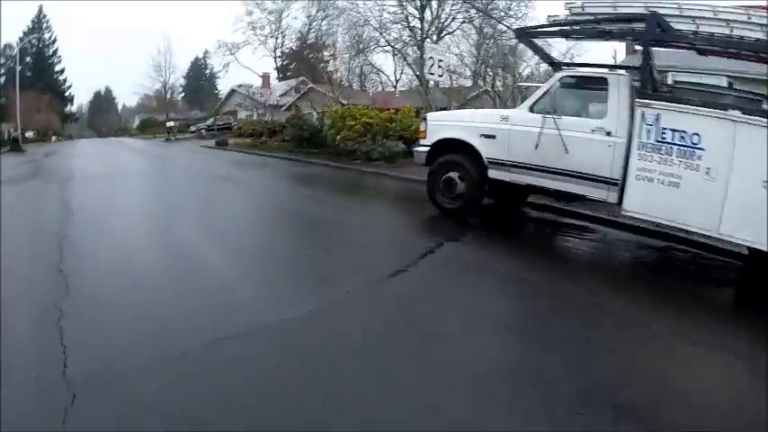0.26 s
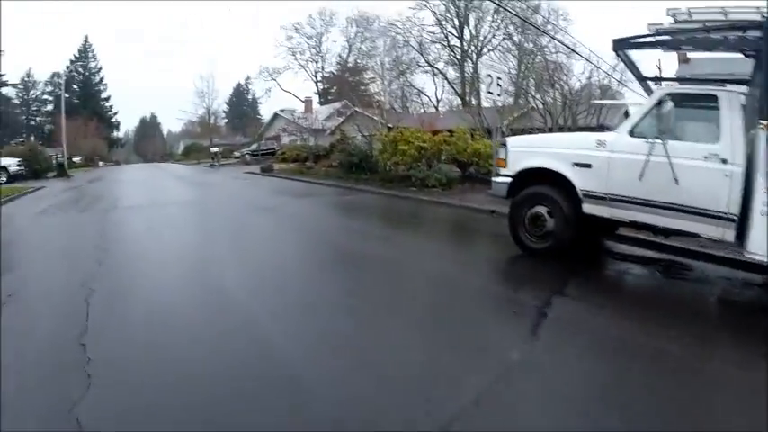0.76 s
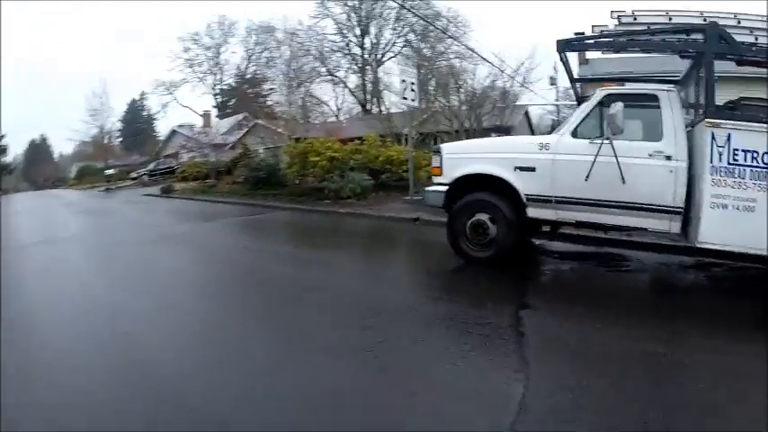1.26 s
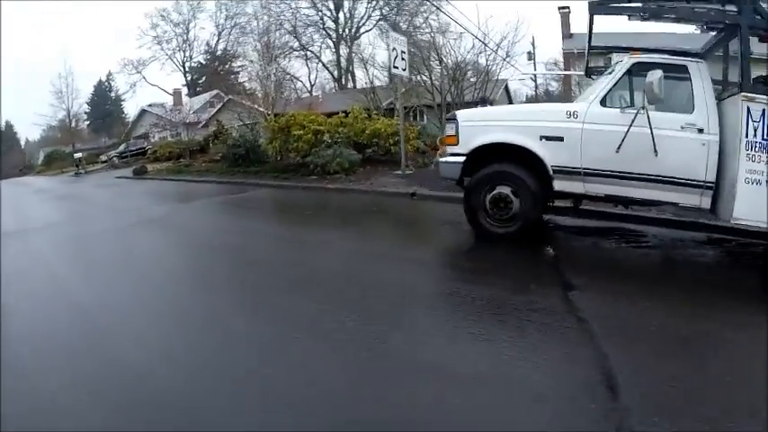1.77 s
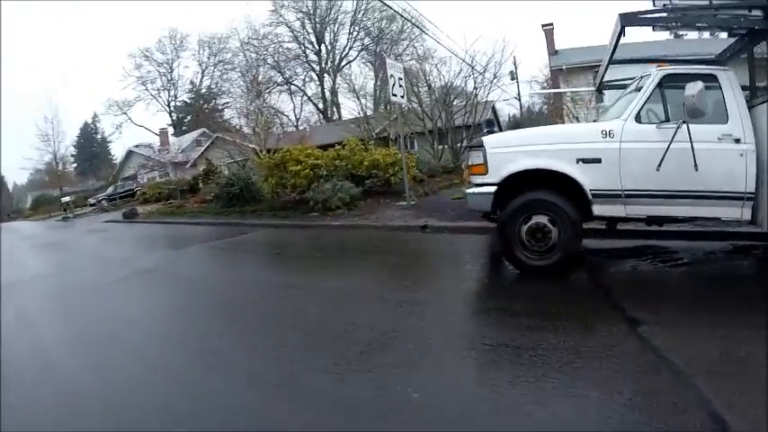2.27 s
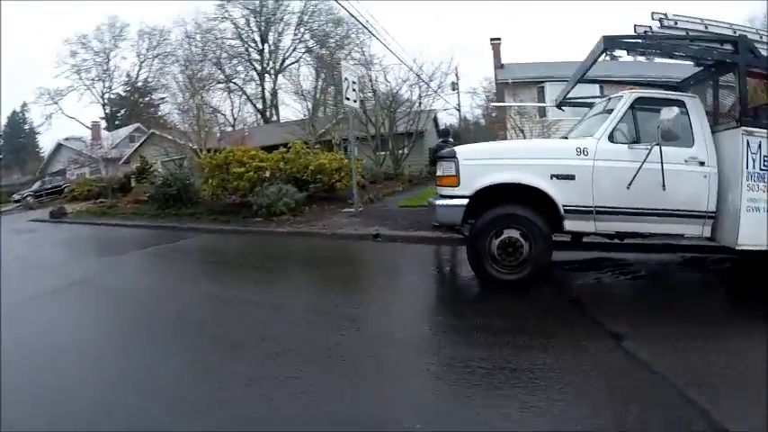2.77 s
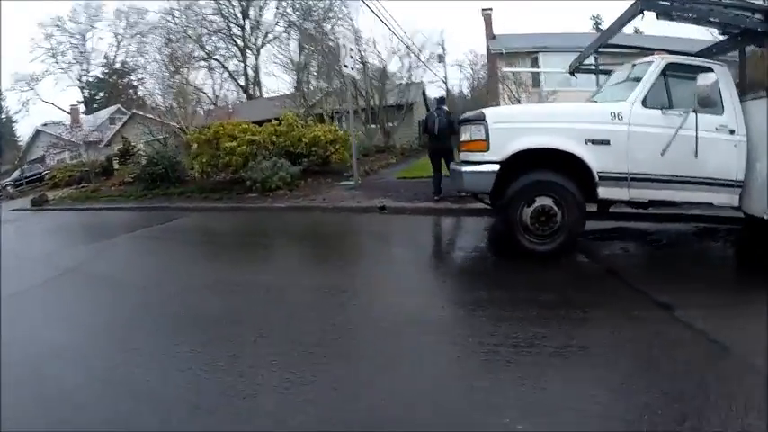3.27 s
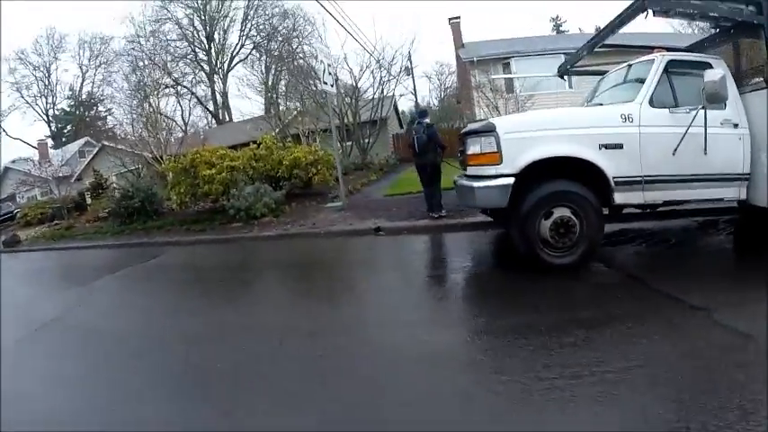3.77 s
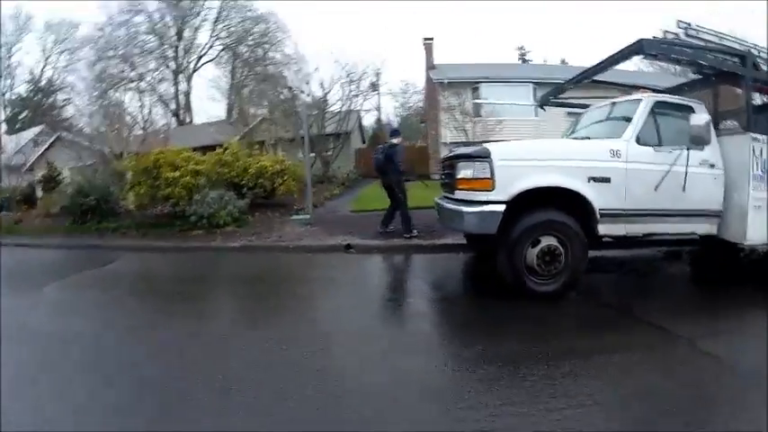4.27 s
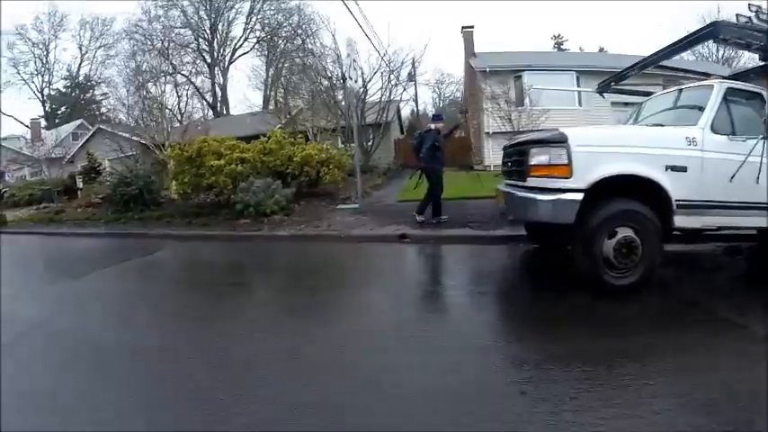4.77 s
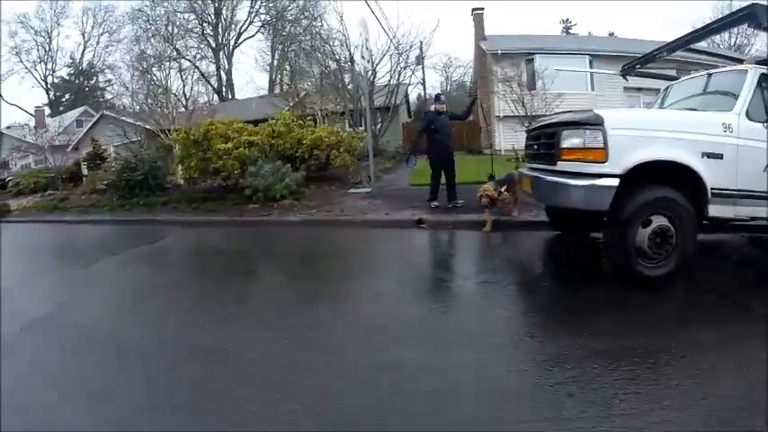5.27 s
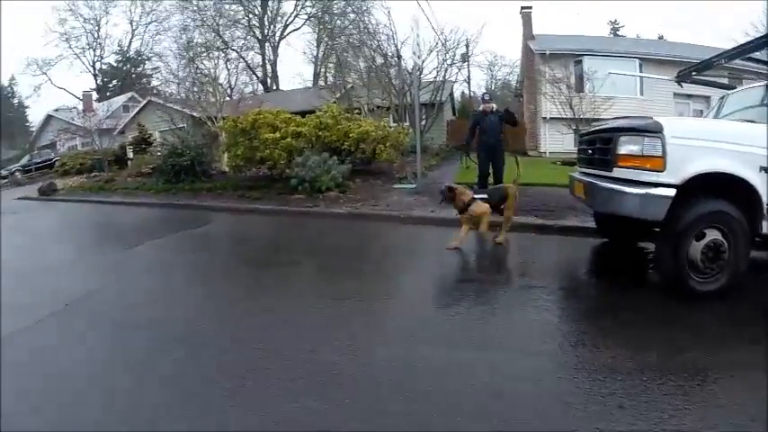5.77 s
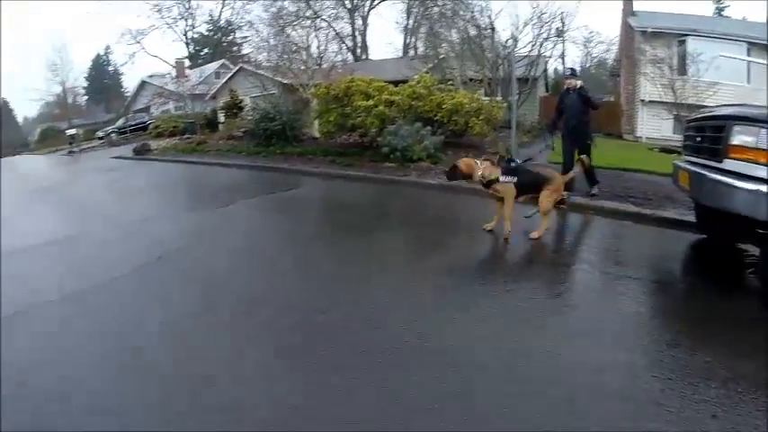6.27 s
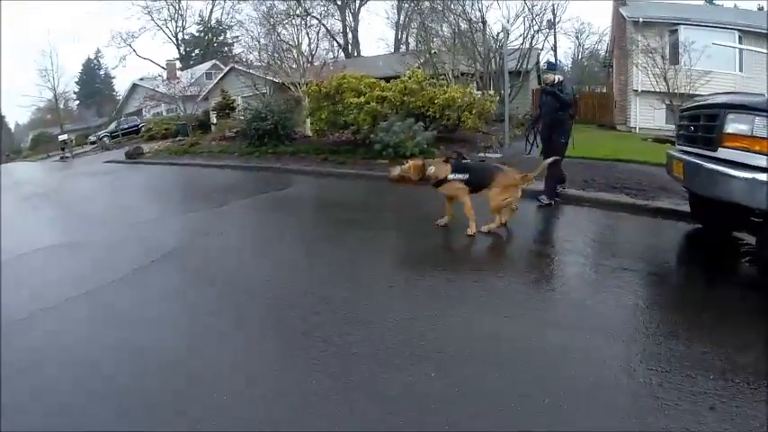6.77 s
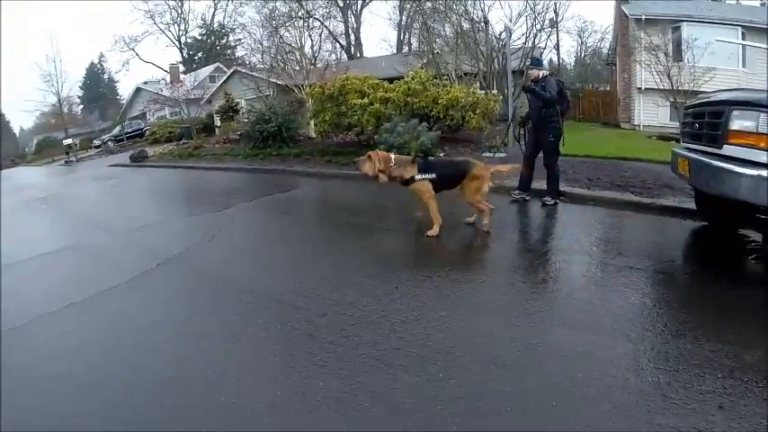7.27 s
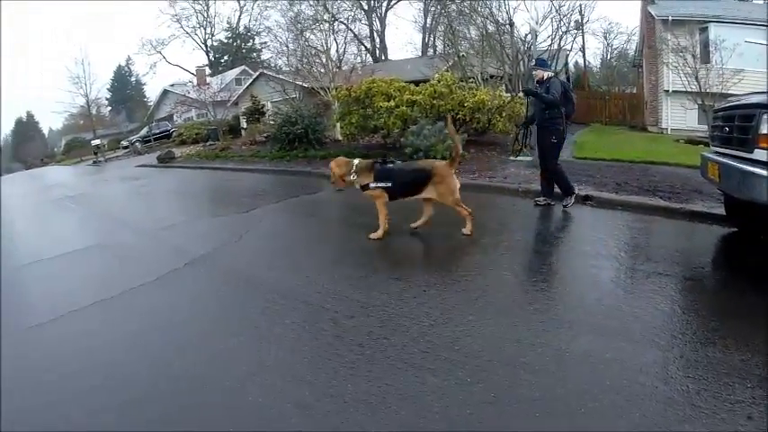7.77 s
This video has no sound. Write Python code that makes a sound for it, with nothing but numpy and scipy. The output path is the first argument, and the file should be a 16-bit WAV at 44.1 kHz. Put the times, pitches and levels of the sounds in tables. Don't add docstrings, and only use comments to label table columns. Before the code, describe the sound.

Dry, close plastic clicking comes first, sparse and irregular, some snaps sharp and some knocks blunt, with soft low thumps beneath. The open-air bed is very quiet: soft wind rumble, far traffic, fine wet hiss and a barely audible thin whine. Later, light scratchy steps and shivering harness metal enter as a dog passes, much softer than the loudest case knocks heard by the carried microphone.

```python
import sys
import numpy as np
from scipy import signal
from scipy.fft import rfft, irfft, next_fast_len
from scipy.io import wavfile

SR = 44100
rng = np.random.default_rng(int(sys.argv[2]) if len(sys.argv) > 2 else 0)


def to_wav(sig):
    pcm = np.clip(np.atleast_2d(sig), -1, 1) * 32767
    pcm = np.round(pcm).astype(np.int16)
    wavfile.write(sys.argv[1], SR, pcm.T)


def invert_db(level):
    return 10 ** (np.asarray(level, dtype=float) / 20)


N = 354411
LENGTH = 4096

# pitch_hz, level_db, t60_s
TAGS = [
    [(11500, 0, .035), (11150, -6, .02), (15100, -24, .03), (4860, -20, .02)],
    [(12130, 0, .03), (12550, -10, .016), (11700, -12, .02)],
    [(9150, 0, .025), (8170, -10, .03), (9500, -4, .022)],
]
# time_s, level_db
TROT = [
    (5.7, -81),
    (6.2, -60),
    (6.56, -68),
    (7.1, -59),
    (7.7, -72),
]


def rms_one(x):
    return x / np.sqrt(np.mean(x ** 2) + 1e-20)


def peak_one(rows):
    return rows / (np.abs(rows).max(axis=1, keepdims=True) + 1e-20)


def band(rows, low_hz, high_hz, order=3):
    sos = signal.butter(order, [low_hz, min(high_hz, 20000)], "band", fs=SR, output="sos")
    return signal.sosfilt(sos, rows)


def drift(rate):
    r = np.exp(-80 * np.pi * rate / SR)
    slow = signal.lfilter([1], [1, -2 * r, r * r], rng.standard_normal(N // 40 + 2002))[2000:]
    return np.interp(np.arange(N) / 40, np.arange(len(slow)), rms_one(slow))


def ring(clicks, hz, t60):
    r = invert_db(-60 / (t60 * SR))
    w = 2 * np.pi * hz / SR
    return signal.lfilter([0, np.sin(w)], [1, -2 * r * np.cos(w), r * r], clicks + 1e-18)


def strike(contact, modes, spread_db):
    luck = invert_db(spread_db * rng.standard_normal((len(contact), len(modes))))
    rows = 0
    for k, (hz, db, t60) in enumerate(modes):
        rows = rows + invert_db(db) * luck[:, [k]] * ring(contact, hz, t60)
    return peak_one(rows)


def contacts(count, per_s, fade_s, first):
    rows = rng.standard_normal((count, LENGTH)) * (rng.random((count, LENGTH)) < per_s / SR)
    rows[:, 0] = -first
    return rows * np.exp(-(np.arange(LENGTH) / SR / fade_s) ** 2)


def ease(rise_s):
    return 1 - np.exp(-np.arange(LENGTH) / SR / rise_s)


def place(times, rows):
    out = np.zeros(N + LENGTH)
    for s, row in zip(times, rows):
        start = round(s * SR)
        out[start:start + LENGTH] += row
    return out[:N]


def single_modes(table):
    click = np.arange(LENGTH) == 0
    rows = np.array([band(ring(click, hz, t60), 0.31 * hz, 4.6 * hz) for s, db, hz, t60 in table])
    s, db, hz, t60 = np.array(table).T[:, :, None]
    return place(s[:, 0], invert_db(db) * peak_one(ease(0.00095) * rows))


def banded_noise(spectrum, patchy_db, rate):
    hz, db = np.transpose(spectrum)
    size = next_fast_len(N)
    grid = np.fft.rfftfreq(size, 1 / SR) + 1e-3
    tilt_db = np.interp(np.log(grid), np.log(hz), db, left=-90, right=-90)
    coloured = rfft(rng.standard_normal(size)) * invert_db(tilt_db)
    octave = np.log2(grid / hz[0])
    together = drift(rate / 3)
    out = 0
    for k in range(int(np.log2(hz[-1] / hz[0])) + 2):
        window = np.cos(np.pi / 2 * np.clip(octave - k, -1, 1)) ** 2
        part = irfft(coloured * window, size)[:N]
        out = out + part * invert_db(patchy_db * (.6 * together + drift(rate)))
    return rms_one(out)


def street():
    # frequency_hz, level_db (per Hz)
    wind_colour = [(5.9, -8.5), (10, 0), (40, 7), (86, -7), (129, -8.5), (200, -37), (260, -24.5),
                   (440, -120)]
    traffic_colour = [(47, -29), (80, 0.5), (343, -9.5), (3000, -21), (3900, -32), (6600, -120)]
    hiss_colour = [(1060, -19), (1800, -2.5), (2790, -3), (5180, -5), (5900, -5.5), (7340, -12.5),
                   (12000, -17.5), (13200, -21), (15200, -25.5)]
    # time_s, level_db
    gusts = [(0.0, -58), (0.18, -50.5), (2.28, -55.5), (2.48, -49), (2.68, -53.5), (4.05, -55), (5.46, -48),
             (5.91, -53.5), (6.42, -49.5), (6.96, -58), (8.04, -54)]
    # pitch_hz, width_hz, level_db
    whine_tone = (5670, 45, -77)
    t = np.arange(N) / SR
    wind = invert_db(np.interp(t, *np.transpose(gusts))) * banded_noise(wind_colour, patchy_db=3.0, rate=4.2)
    traffic = invert_db(-59.5) * banded_noise(traffic_colour, patchy_db=.5, rate=10)
    fade_db_per_s, splash_db, splash_s, splash_width_s = 0.37, 3.5, 6.78, 0.23
    splash = splash_db * np.exp(-((t - splash_s) / splash_width_s) ** 2)
    hiss_db = -65 - fade_db_per_s * t + splash
    hiss = invert_db(hiss_db) * banded_noise(hiss_colour, patchy_db=.4, rate=14)
    hz, width, db = whine_tone
    wander_hz, wander_per_s = 60, .8
    turns = np.cumsum(hz + wander_hz * drift(wander_per_s)) / SR
    flutter = signal.sosfilt(signal.butter(2, width, fs=SR, output="sos"), rng.standard_normal(N))
    whine = rms_one(flutter * np.sin(2 * np.pi * turns)) * invert_db(db - 1.5 + 1.5 * drift(4.4))
    return wind + traffic + whine + hiss


def tick_rows():
    # time_s, peak_db of the main modes,
    # then low_db, middle_db, upper_db relative to it
    blunt = [(0.7444, -15, -11.5, -25, -16.5), (0.7943, -37.5, -3, 7, 5), (0.8112, -30.5, -20, -27, -16),
             (1.0343, -27.5, -16, -18, -12.5), (1.5753, -38, -18, -6, -10), (1.5764, -26.5, -11, -6, -15),
             (3.5554, -8, -23, 3.5, -2), (3.5714, -32.5, -29.5, -3, -20), (5.1461, -7.5, -12, -25, -27.5),
             (6.433, -14.5, -17.5, -7, -10), (6.5717, -18.5, -22, -14, -19), (6.8688, -33, -26, -13, -22),
             (7.0179, -35, -6, -5, -16)]
    sharp = [(0.4069, -48, -7, -5, -6), (1.2288, -17, -22, -13, -24), (1.2299, -14.5, -11, -27, -30),
             (1.7872, -32.5, -14, -6, -13), (2.3012, -41, -23, -1, -1), (2.7738, -24, 4.5, 5, -17),
             (3.0751, -37, 4.5, 5, -3), (3.842, -48, 0, 1.5, -1), (3.9013, -21, -21.5, -6.5, -14.5),
             (4.5356, -43, -8, -3, -8.5), (4.6172, -27, -25, 2, 1), (4.6179, -16.5, -41, -26, -25),
             (5.1604, -36, 2, -4, -17), (5.1616, -23, -6, -2, -22), (5.7384, -50.5, -9, 13.5, 0),
             (5.74, -45, 7, 0, 7)]
    lid = [(1.1116, -37.5, -10, -0.5, -15), (1.1138, -56, -18, -8, -19), (1.5464, -34.5, -22, 5, 1.5),
           (3.0184, -37, -8, 6, -10.5), (3.2353, -37, -11, -7, -18), (5.2531, -25.5, -8, 0, -11.5),
           (7.1912, -29, -8.5, -4.5, -19), (7.4608, -37.5, -10, 6, -12), (7.7358, -33, -14, 2, -12.5),
           (7.752, -30.5, -21, -6, -19)]
    # time_s, peak_db of the main modes, hardness_db (level of the middle modes)
    faint_ticks = [(0.075, -50.5, 3), (0.282, -44, 1.5), (0.3977, -52, -2), (0.907, -54, -1),
                   (1.466, -53, -5), (2.385, -45.5, -19), (2.939, -60, 7), (3.3906, -37.5, -5),
                   (3.405, -48.5, 2), (4.3847, -41.5, -6), (4.5482, -40, -3), (4.5863, -49, 6.5),
                   (4.7045, -41.5, -1), (4.725, -45.5, -8), (4.799, -43.5, -21), (4.8872, -34, -8),
                   (4.8993, -40, -15), (2.79, -56, 9), (5.029, -48, 4.5), (5.4457, -76, 13.5),
                   (5.8193, -65, 9), (5.9502, -44.5, 6), (6.0928, -46, -5), (7.3524, -46, -2),
                   (7.671, -44.5, -10), (7.6934, -54, 1.5)]
    low_db, upper_db = -11, -12
    faint = [(s, db, low_db, hard, hard + upper_db) for s, db, hard in faint_ticks]
    # crack_db over the upper modes, lid_db over the wall modes, lasting mode_db
    kinds = ((blunt, (-13.5, 1, -14)), (faint, (-19, -0.76, -15.5)),
             (sharp, (-4.5, -12.5, -9.5)), (lid, (-12, 10.7, -9.5)))
    return [(*row, *kind) for rows, kind in kinds for row in rows]


def ticks():
    # pitch_hz, level_db, t60_s
    case_modes = [
        [(1640, 0, .0095), (1330, -17, .007), (1800, -10, .007)],
        [(2260, 0, .007), (2050, -8, .006)],
        [(2830, 0, .009), (2600, -9, .007)],
        [(3290, 0, .013), (2390, -1, .014), (3840, -6, .01), (4180, -6, .01), (2070, -5, .012)],
        [(4500, -8, .005), (4870, -2, 0.006), (5400, -2, 0.005), (5950, 5, 0.008), (6500, -4, .004),
         (7150, -6, .004)],
        [(8000, 8, 0.001), (8700, 4, 0.002), (10200, 0, 0.0019), (12300, 0, .003), (14000, -8, 0.003)],
    ]
    # low_hz, high_hz
    case_edges = [(1150, 2500), (1550, 3200), (2000, 3800), (1900, 5000), (3800, 7800), (6500, 13500)]
    # pitch_hz, t60_s
    case_ring = (2191, .050)
    contact_cycles = .7
    s, main_db, low_db, mid_db, upper_db, crack_db, lid_db, ring_db = np.array(tick_rows()).T[:, :, None]
    touch = contacts(count=len(s), per_s=1500, fade_s=.0012, first=3.5)
    levels_db = (low_db + 9.0, 0, mid_db - lid_db / 2, mid_db + lid_db / 2,
                 upper_db + 9.0, upper_db + crack_db + 12.5)
    rows = invert_db(ring_db) * peak_one(band(ring(touch, *case_ring), *case_edges[1], order=1))
    for db, modes, edges in zip(levels_db, case_modes, case_edges):
        struck = ease(contact_cycles / edges[1]) * strike(touch, modes, spread_db=2)
        rows += invert_db(db) * peak_one(band(struck, *edges, order=2))
    rustle = rng.standard_normal(touch.shape) * invert_db(-60 * np.arange(LENGTH) / SR / 0.021)
    peak = np.abs(rows).max(axis=1, keepdims=True)
    rows += invert_db(-15.0) * peak * peak_one(band(rustle, 2400, 3730))
    rows = invert_db(main_db) * band(rows, 950, 15500, order=2)
    rows /= np.maximum(np.abs(rows).max(axis=1, keepdims=True) / 1.05, 1)
    return place(s[:, 0], rows)


def wobbles():
    # peak_s, peak_db, width_s
    swing_table = [(0.137, -45, .012), (0.37, -44.5, 0.013), (0.684, -46, 0.02), (0.803, -44.5, 0.02),
                   (1.024, -44, 0.021), (1.131, -45.5, .02), (1.597, -40, 0.031), (1.71, -39, 0.014),
                   (1.775, -45.5, 0.017), (2.01, -48, 0.021), (2.098, -46, 0.017), (2.333, -37.5, 0.014),
                   (2.426, -35, 0.022), (2.557, -49, 0.019), (3.023, -40.5, 0.017), (3.233, -46, .021),
                   (3.562, -42.5, 0.0085), (3.643, -47, 0.033), (4.04, -47.5, 0.029), (4.235, -48.5, 0.016),
                   (4.868, -41, 0.059), (4.92, -44.5, .016), (4.818, -46.5, 0.017), (2.76, -50.5, 0.028),
                   (5.449, -48, .015), (5.019, -46, .013), (5.18, -47, 0.016), (6.25, -52.5, 0.037),
                   (6.393, -38, 0.019), (6.486, -39.5, 0.027), (6.771, -39.5, .017), (7.171, -42.5, 0.013),
                   (7.838, -39.5, .018)]
    mount_hz, spread_hz = 128.6, 12
    lead_s = .03
    s, db, width = np.array(swing_table).T[:, :, None]
    luck = rng.random((len(s), 2))
    hz = mount_hz + spread_hz * (2 * luck[:, :1] - 1)
    t = np.arange(LENGTH) / SR - lead_s
    width = np.clip(width, .012, .05)
    rise = (t / (.55 * width)) ** 2
    fall = (np.abs(t) / (.7 * width)) ** 1.2
    swell = np.exp(-np.where(t < 0, rise, fall))
    thump = .12 * rms_one(band(rng.standard_normal(swell.shape), 90, 240))
    tone = np.sin(2 * np.pi * (hz * t + luck[:, 1:]))
    swings = place(s[:, 0] - lead_s, invert_db(db) * swell * (tone + thump))
    tremble = rms_one(ring(rng.standard_normal(N) * invert_db(5 * drift(6.5)), mount_hz, t60=.1))
    return swings + invert_db(-70.5) * tremble


def pings():
    # time_s, peak_db, pitch_hz, t60_s
    ping_table = [(.163, -53.5, 1560, 0.038), (1.4676, -50.5, 2770, 0.023), (4.74, -58, 1740, 0.12),
                  (5.257, -51, 4400, 0.054), (5.4804, -62, 3080, .035), (6.516, -37, 2900, 0.012),
                  (7.6934, -47.5, 2960, 0.02), (6.283, -57.5, 6220, .015), (6.352, -58, 9400, .07),
                  (6.357, -66, 8200, .06), (6.557, -52, 8200, 0.097), (6.56, -58, 15100, .015),
                  (6.577, -52, 15100, .02), (6.373, -67, 15100, .02), (6.848, -51.5, 6900, .015),
                  (6.738, -56, 3700, .015)]
    return single_modes(ping_table)


def brushes():
    # time_s, level_db, base_hz (grains lie 1.23 to 1.4 times higher), length_s
    strokes = [
        (0.37, -68, 1700, 0.13),
        (11, -61.5, 2300, 0.2),
        (5.5, -67.5, 4500, 0.076),
        (2.06, -65, 4600, 0.043),
    ]
    t = np.arange(N) / SR
    grains = rng.standard_normal(N) * (rng.random(N) < 1500 * invert_db(4 * drift(30)) / SR)
    out = np.zeros(N)
    for s, db, hz, length in strokes:
        swell = np.exp(-((t - s) / length) ** 2)
        out += invert_db(db) * swell * rms_one(band(grains, 1.23 * hz, 1.4 * hz))
    return out


def knocks():
    # time_s, peak_db, pitch_hz, t60_s
    knock_table = [
        (1.546, -39, 830, 0.019),
        (2.772, -78, 1030, 0.0066),
        (3.554, -43.5, 696, 0.028),
        (4.887, -49.5, 870, 0.023),
        (4.899, -48, 795, 0.02),
        (5.144, -68, 1070, 0.023),
        (7.19, -44, 840, 0.024),
        (.8113, -45, 810, 0.017),
        (2.3013, -49, 780, .015),
    ]
    return single_modes(knock_table)


def scuffs():
    # time_s, peak_db, centre_hz
    scuff_table = [(1.449, -49, 2790), (5.338, -50, 4830), (5.4791, -46.5, 2900), (5.522, -51, 3230),
                   (5.828, -47.5, 4760), (6.045, -45.5, 5040), (6.172, -50, 2940), (6.3272, -43.5, 6100),
                   (6.367, -34.5, 4870), (6.3817, -45, 2770), (6.4564, -39, 4970), (6.496, -38.5, 5060),
                   (6.514, -40, 2940), (6.551, -47, 2530), (6.584, -45, 4640), (6.6372, -39.5, 5700),
                   (6.753, -50, 4150), (6.774, -36, 4860), (6.788, -33.5, 4600), (6.797, -42, 4560),
                   (6.844, -53, 4160), (6.9433, -38, 4790), (6.993, -42.5, 4400), (7.076, -32.5, 5250),
                   (7.1107, -41.5, 4870), (7.195, -39.5, 4300), (7.331, -41, 4550), (7.41, -54, 4480),
                   (7.505, -49.5, 4250), (7.564, -43.5, 5000), (6.336, -48, 6200), (6.466, -42, 5000),
                   (6.646, -49, 6000), (6.807, -47, 4000), (6.953, -46, 5200), (7.084, -45, 4600),
                   (7.122, -46, 5000), (7.312, -46.5, 5000), (6.599, -49, 3500)]
    stroke_s, stroke_spread_db = 0.011, 2.5
    light_paws, light_db, light_hz = 22, -49.5, 4400
    luck = rng.random((light_paws, 2))
    light = [(TROT[0][0] + 2 * a, light_db, light_hz * (b + .5)) for a, b in luck]
    s, db, hz = np.array(scuff_table + light).T[:, :, None]
    length = stroke_s * invert_db(stroke_spread_db * rng.standard_normal(s.shape))
    t = np.arange(LENGTH) / SR / np.clip(length, .002, .04)
    stroke = t ** 0.48 * np.exp(-2.5 * t ** 0.71)
    grit = contacts(count=len(s), per_s=6400, fade_s=1, first=0) * stroke
    body = np.array([ring(row, f, 12 / f) for row, f in zip(grit, hz[:, 0])])
    skirt = band(grit, 2200, 6800)
    bright = band(grit, 6100, 11800)
    rows = peak_one(band(body, 1500, 15400)) + 0.62 * peak_one(skirt) + 0.59 * peak_one(bright)
    return place(s[:, 0], invert_db(db) * peak_one(rows))


def shimmer():
    # pitch_hz, level_db, t60_s
    strap_clips = [(4870, 22, 0.022), (5800, -3, 0.0094), (6300, 17, .015), (7340, -11, .012),
                   (3950, 16, 0.013)]
    per_s, spread_db = 20, 5
    detune = .05
    s, level_db = np.transpose(TROT)
    modes = [(hz * (1 + detune * rng.uniform(-1, 1)), db, t60) for hz, db, t60 in 2 * sum(TAGS, strap_clips)]
    span = 2 * SR + LENGTH
    born = rng.random((len(modes), span)) < per_s * invert_db(6 * drift(14)[:span]) / SR
    size_db = spread_db * np.minimum(rng.exponential(1, span), 3)
    grains = born * invert_db(size_db) * rng.choice([-1, 1], span)
    metal = sum(invert_db(db) * ring(row, hz, t60) for row, (hz, db, t60) in zip(grains, modes))
    thin = band(grains.sum(axis=0), 3100, 12500)
    both = rms_one(rms_one(metal) + 0.65 * rms_one(thin))
    envelope_db = np.interp(s[0] + np.arange(span) / SR, s, level_db - 5, right=-130)
    out = np.zeros(N)
    start = round(s[0] * SR)
    out[start:start + span] = both * invert_db(envelope_db)
    return out


def jingles():
    # time_s, lower_tag_db, upper_tag_db, buckle_db
    strikes = [(5.931, -82, -85, -78), (6.0433, -73, -70, -71), (6.0962, -67, -68, -64),
               (6.1211, -68, -72, -70), (6.136, -70, -76, -62), (6.3107, -61, -67, -74),
               (6.3311, -49, -56, -69), (6.347, -57, -39, -62), (6.424, -62, -55, -67),
               (6.4628, -67, -74, -62), (6.4928, -61, -69, -62), (6.5032, -65, -62, -69),
               (6.5352, -46, -62, -64), (6.5547, -52, -42, -51), (6.645, -63, -67, -74),
               (6.664, -63, -55, -76), (6.76, -56, -58, -60), (6.7871, -67, -63, -69),
               (6.84, -69, -67, -74), (6.9138, -60, -80, -64), (6.942, -69, -71, -68),
               (6.9626, -53, -61, -53), (7.0385, -67, -55, -75), (7.0774, -66, -56, -66),
               (7.151, -62, -61, -64), (7.1666, -49.5, -57, -60), (7.196, -57, -70, -75),
               (7.349, -60, -72, -58), (7.4366, -75, -57, -78), (5.8537, -69, -82, -80),
               (6.0128, -80, -72, -80), (6.173, -73, -76, -72), (6.2214, -66, -76, -78),
               (6.2832, -65, -77, -76), (6.7357, -72, -72, -74), (6.801, -68, -72, -72),
               (7.0885, -73, -73, -74), (7.3348, -66, -70, -70), (6.977, -58, -70, -60),
               (7.462, -59, -52, -58)]
    s, *levels_db = np.array(strikes).T[:, :, None]
    loudest_db = np.max(levels_db, axis=0)
    tick_db = -66 + 0.64 * (loudest_db - loudest_db.mean())
    touch = contacts(count=len(s), per_s=900, fade_s=0.006, first=1.8)
    metal = sum(invert_db(db + 7.5) * strike(touch, modes, spread_db=5) for db, modes in zip(levels_db, TAGS))
    tick = band(touch, 6000, 14500)
    return place(s[:, 0], ease(0.00071) * band(metal, 2700, 14000) + invert_db(tick_db) * peak_one(tick))


def scene():
    case = ticks() + knocks() + wobbles() + brushes()
    dog = jingles() + shimmer() + scuffs() + pings()
    return (case + dog + street())[None]


def low_pass(x):
    return signal.sosfilt(signal.butter(12, 16520, fs=SR, output="sos"), x)


def record(dry):
    dull = signal.sosfilt(signal.cheby2(8, 30, 16500, fs=SR, output="sos"), dry)
    return low_pass(dull)


dry = scene()
out = record(dry)
to_wav(out)
```